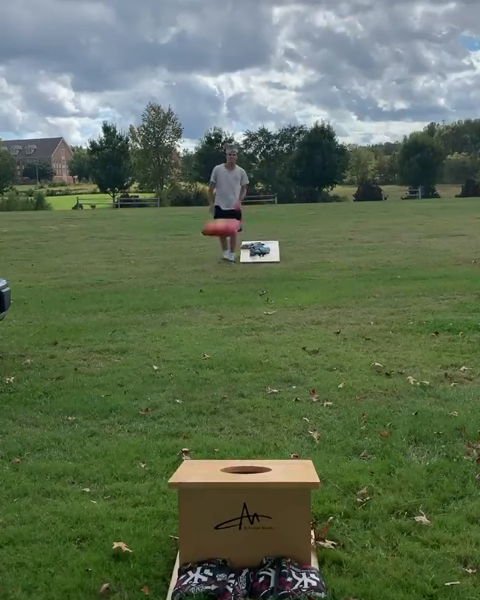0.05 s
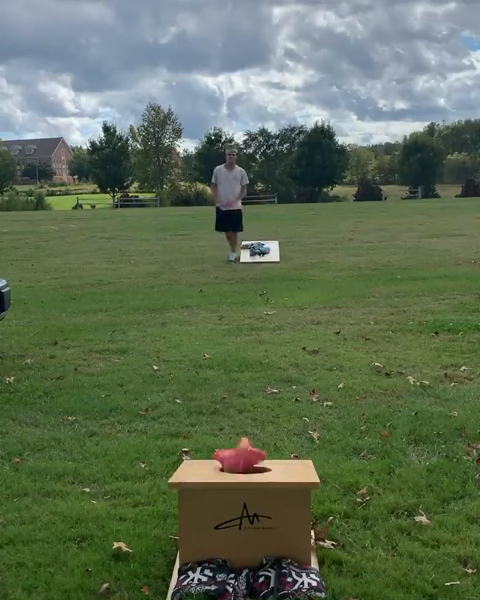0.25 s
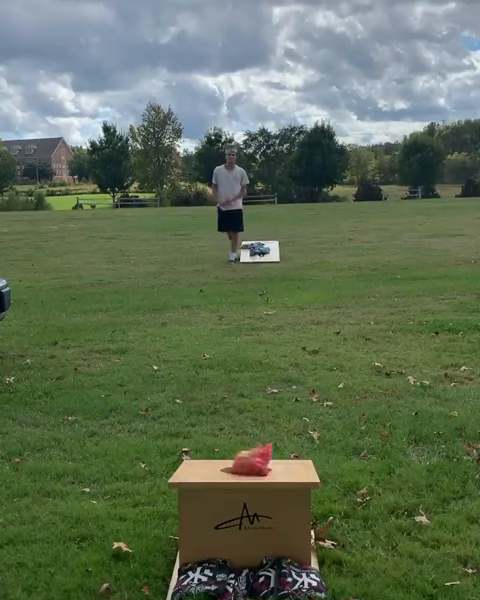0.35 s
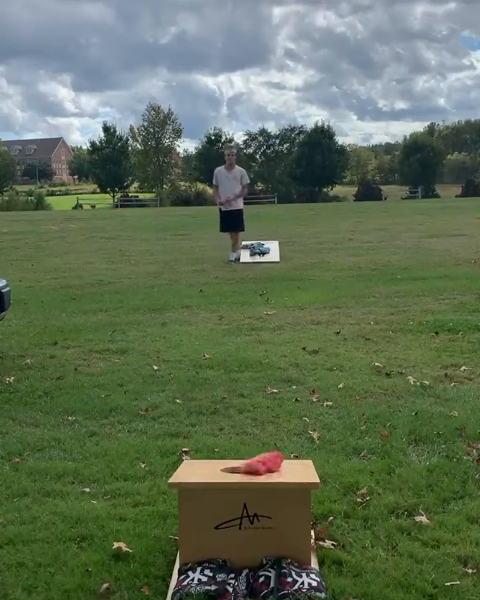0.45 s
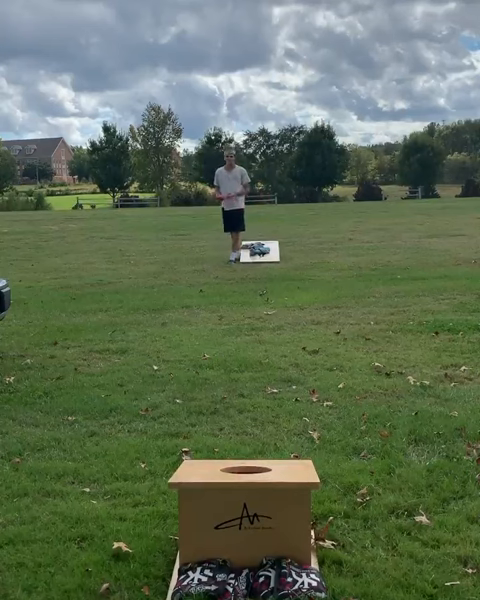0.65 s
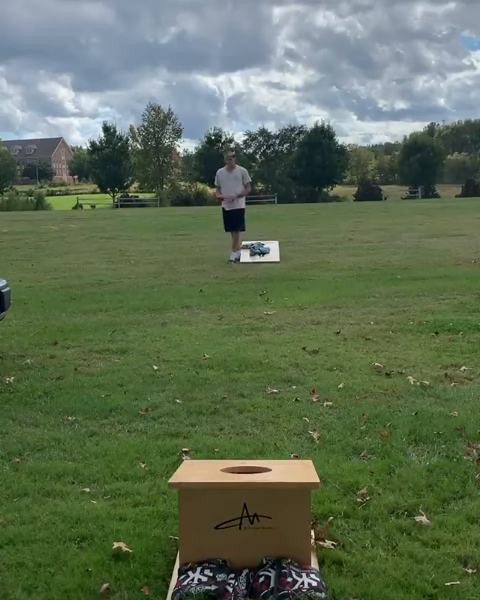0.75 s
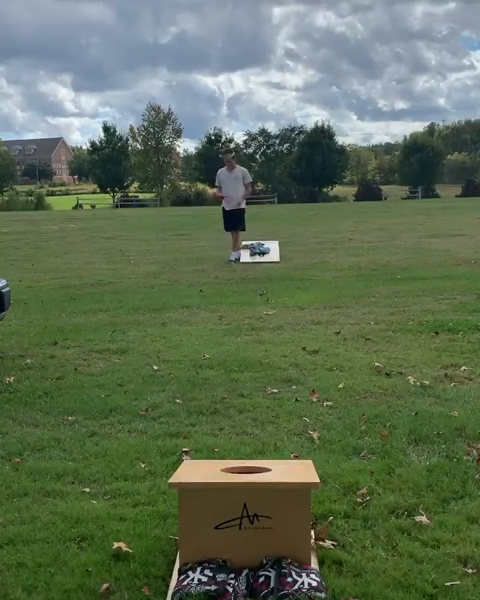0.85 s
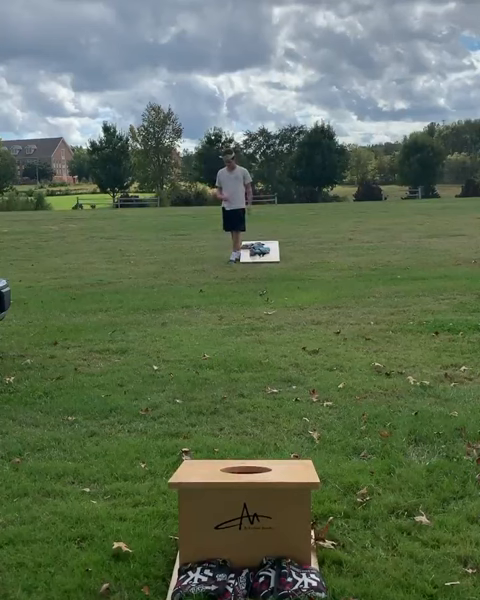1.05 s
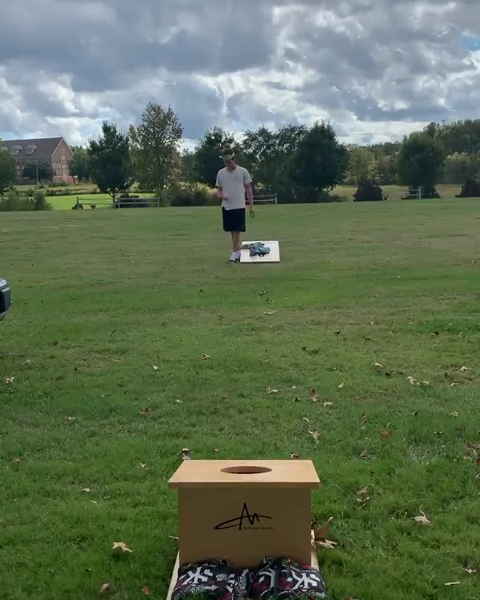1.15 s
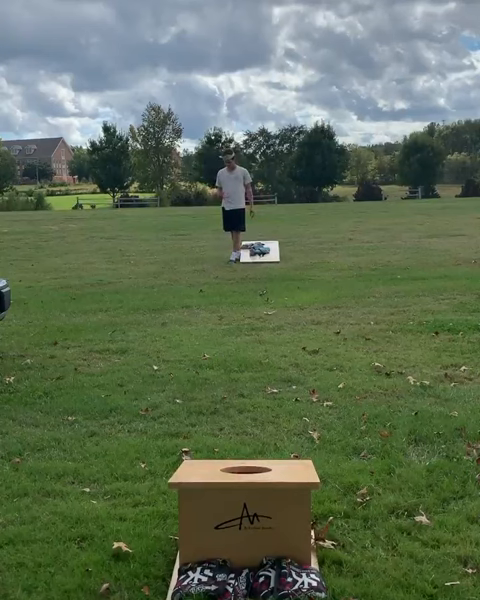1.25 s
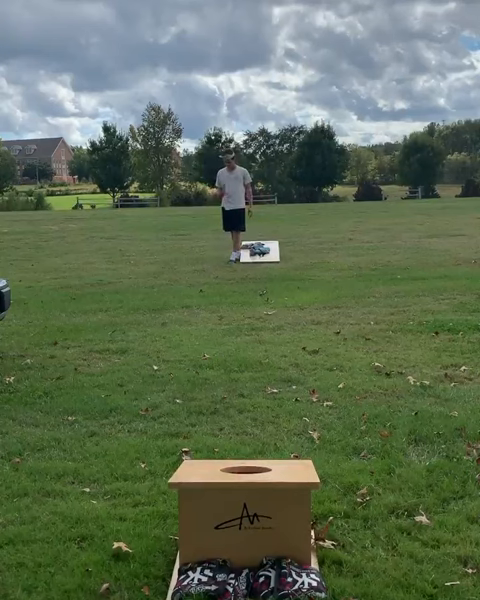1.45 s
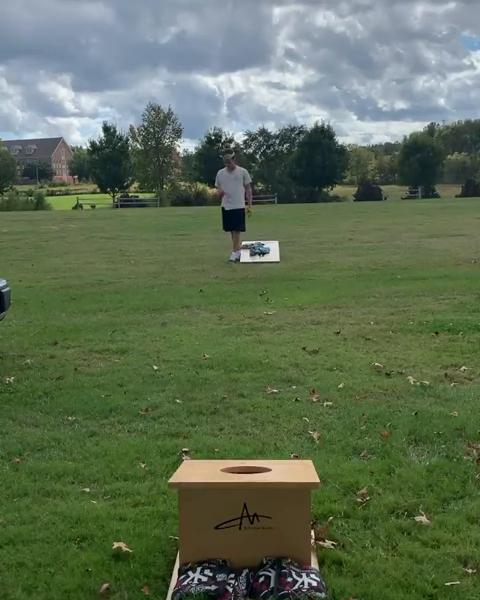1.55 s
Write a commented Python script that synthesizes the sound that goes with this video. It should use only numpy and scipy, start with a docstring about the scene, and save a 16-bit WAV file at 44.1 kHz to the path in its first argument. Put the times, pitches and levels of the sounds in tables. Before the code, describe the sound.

A beanbag smacks onto a hollow wooden box lid outdoors, over faint distant traffic rumble

```python
"""A beanbag slaps onto the lid of a hollow plywood box on a lawn: contact pushes excite decaying modes.
Its filling crunches as dense pellet ticks, then shaped noise rustles as the bag slides through the hole.
Delayed copies echo the slap from the sides, and decaying noise scatters it off things nearby.
Far traffic and leaves are noise in octave bands; a far engine is a set of wavering low lines.
A phone a few metres in front hears the scene through its microphone's colour."""
import sys
import numpy as np
from scipy import signal
from scipy.fft import rfft, irfft
from scipy.io import wavfile
from scipy.ndimage import uniform_filter1d, map_coordinates

SR = 44100
rng = np.random.default_rng(int(sys.argv[2]) if len(sys.argv) > 2 else 0)


def master_out(mix):
    """Clip the mix to full scale and print it as 16-bit PCM to the path in sys.argv[1]."""
    frames = np.transpose(np.atleast_2d(mix))
    ceiling = np.clip(frames, -1, 1)
    pcm = np.round(ceiling * 32767).astype(np.int16)
    wavfile.write(sys.argv[1], SR, pcm)


def invert_db(level):
    """Linear amplitude ratio for a level in decibels (20 dB per decade), elementwise."""
    return 10 ** (np.asarray(level, dtype=float) / 20)


N = 70560

# far traffic and leaves, relative spectral density: (f/Hz, level/dB)
FIELD_SPECTRUM = [(20, -34), (45, -5.5), (75, -5.5), (120, -7.5), (150, -10.5), (240, -12), (380, -18.5),
                  (600, -17.5), (900, -15), (1300, -21.5), (1900, -23.5), (2400, -36), (4000, -35.5),
                  (7000, -42.5), (10000, -52.5), (16000, -68)]
# stereo width of the field: (f/Hz, side minus mid level/dB)
FIELD_WIDTH = [(60, -66), (110, -69), (200, -32.5), (380, -10.5), (700, -26.5), (1290, -31), (2380, -5.5),
               (4400, -15), (8120, -7.5), (15000, -3.5)]
# lines of the far engine before wavering: (f/Hz, rms level/dB)
ENGINE_LINES = [(51, -67.5), (68, -48), (85, -59.5), (103, -44.5), (122, -49), (196, -65.5), (305, -57),
                (320, -60)]
# echoes from the sides: (delay t/s, level/dB, half the left-right lag t/s, positive leads on the left)
SIDE_ECHOES = [(.0203, -19.5, .00012), (0.0351, -26, -.00005)]
# colour of the diffuse scatter: (f/Hz, level/dB)
SCATTER_COLOUR = [(100, -53), (250, -11), (500, -14), (1500, -1), (4000, 2), (9000, 0.5), (16000, -1)]
# cloth sliding over the rim of the hole: (middle t/s, half length t/s, level/dB, loss at 16 kHz/dB)
RIM_SLIDES = [(0.376, 0.039, -60, -11), (.64, 0.16, -63.5, 9.0)]
# colour of the cloth rustle: (f/Hz, level/dB)
CLOTH_COLOUR = [(2500, -5), (5000, 1), (9000, 11.5), (13000, -14), (16000, -0.5)]
# clumps of filling packing down: (start t/s, level/dB re CLUMP_DB)
FILLING_CLUMPS = [(.2414, -5), (.2424, 0), (.2440, -3), (.2457, 1), (.2481, -4), (.2505, -7), (.2545, -6),
                  (.2571, -5), (.2594, -9), (.2655, -14)]
# colour of the pellet ticks: (f/Hz, level/dB)
PELLET_COLOUR = [(1000, -30), (2000, 6.5), (3000, 1.5), (4700, 4.5), (5900, 3.5), (6900, -4.5), (8000, 2),
                 (10000, -10), (11500, -6.5), (13000, -11.5), (16000, -14)]
# the bag lands edge first, then with its weight, then flops over: (t/s, level/dB, contact spread t/s)
CONTACTS = [(.24156, -11.7, .00016), (.24252, 0, .00018), (.24474, -16, .00012)]
# modes of lid and air: (f/Hz, level/dB, t60/s, +1 or -1 as it first moves toward or away from the phone)
BOX_MODES = [(152.5, -9, .152, -1), (180, -1.2, .026, 1), (247, -9.9, .032, -1), (296, -23, .171, -1),
             (366, -21.4, .169, 1), (435, -7.5, .027, 1), (490, .2, .023, -1), (634, -10, .05, -1),
             (677, -19.1, .089, -1), (746, -9.3, .045, 1), (858, -13, .026, 1), (993, -21.9, .077, -1),
             (1196, -6.1, .037, 1), (1412, -15.7, .05, -1), (1642, 3.7, .053, 1), (1870, -15.8, .101, 1)]
# the two capsules hear a frontal sound alike except toward the top: (f/Hz, side minus mid level/dB)
FRONT_WIDTH = [(5000, -40), (10000, -22), (12500, -7), (16000, -7)]
# response of the phone microphone: (f/Hz, level/dB)
MIC_RESPONSE = [(3000, 0), (3800, 0), (4350, -6), (4680, -22), (5000, -5), (5400, 0), (6300, 2), (7100, 0),
                (7900, -4), (8450, -1), (8700, -15), (9150, -15), (9450, -1), (10300, -6), (11000, 0),
                (11950, 0), (12250, -18), (12650, -4), (13000, -20), (13450, -3), (15650, 0), (15850, -45)]

FIELD_DB, SWELL_DB, FLICKER_DB = -40.5, .4, .7
WAVER_HZ, WAVER_DB = 1.31, 2.5
ECHO_LOW_HZ = 330  # the echoes are thin, without bass below this
SCATTER_DB, SCATTER_RISE_S, SCATTER_T60_S = -13.5, .007, .22
PELLETS_PER_S, PELLET_SPREAD_DB = 22000, 1.0
CLUMP_DB, CLUMP_DECAY_S, CRUNCH_RISE_S = -15.5, .001, .0003
SETTLE_DB, SETTLE_T60_S = -25.5, .1
BOX_LOW_HZ = 110  # a small box radiates little below this


def read(table, hz):
    """Interpolation: the level in dB of an (f/Hz, level/dB) table, straight on a log-frequency axis."""
    a = np.array(table, float)
    return np.interp(np.log(hz + 1), np.log(a[:, 0]), a[:, 1])


def colour(x, table):
    """Minimum phase: folding the cepstrum of the table's gains gives a causal filter."""
    size = 4096
    hz = np.arange(size // 2 + 1) * SR / size
    cepstrum = irfft(read(table, hz) * np.log(10) / 20)
    cepstrum[1:size // 2] *= 2
    cepstrum[size // 2 + 1:] = 0
    response = irfft(np.exp(rfft(cepstrum)))[:size // 2]
    return signal.fftconvolve(x, response)[:N]


def unit(x):
    """Normalisation: the signal scaled to rms 1."""
    return x / np.sqrt(np.mean(x ** 2))


def walk(rate):
    """Smoothed random steps: a slow wander of rms 1 with rate new steps a second."""
    k = int(SR / rate)
    steps = np.repeat(rng.standard_normal(N // k + 1), k)
    return unit(uniform_filter1d(uniform_filter1d(steps, k), k)[:N])


def late(x, delay_s):
    """Propagation delay: interpolation between samples allows a fractional time."""
    return map_coordinates(x, [np.arange(N) - delay_s * SR], mode="nearest")


def field():
    """Superposed noise of many far sources: overlapping octave bands swell together and flicker alone."""
    hz = np.arange(N // 2 + 1) * SR / N
    density = read(FIELD_SPECTRUM, hz)
    mid = rfft(rng.standard_normal(N)) * invert_db(density)
    side = rfft(rng.standard_normal(N)) * invert_db(density + read(FIELD_WIDTH, hz))
    octave = np.log2(hz / 30 + 1e-9)
    swell = walk(1.5)
    out = 0
    for k in range(11):
        band = np.clip(1 - np.abs(octave - k + 1), 0, 1)
        m, s = irfft(mid * band, N), irfft(side * band, N)
        gain = invert_db(SWELL_DB * swell + FLICKER_DB * walk(9.04))
        out = out + gain * np.array([m + s, m - s])
    return invert_db(FIELD_DB) * unit(out)


def engine():
    """Line spectrum with frequency and amplitude modulation: each low line drifts and swells alone."""
    out = 0
    for hz, db in ENGINE_LINES:
        level = np.sqrt(2) * invert_db(db + WAVER_DB * walk(5.7))
        cycles = rng.random() + np.cumsum(hz + WAVER_HZ * walk(5.935)) / SR
        out = out + level * np.sin(2 * np.pi * cycles)
    return out


def surroundings(bag, t):
    """Reflection and scattering: lagged side echoes, and a diffuse tail off grass and things nearby."""
    highpass = signal.butter(2, ECHO_LOW_HZ, "high", fs=SR, output="sos")
    thin = signal.sosfilt(highpass, bag)
    echoes = sum(invert_db(db) * np.array([late(thin, delay - lag), late(thin, delay + lag)])
                 for delay, db, lag in SIDE_ECHOES)
    shape = (1 - np.exp(-t / SCATTER_RISE_S)) * invert_db(-60 * t / SCATTER_T60_S)
    # independent tails left and right, each of about unit energy
    tail = rng.standard_normal((2, N)) * shape / np.sqrt(np.sum(shape ** 2))
    scatter = signal.fftconvolve(tail, colour(bag, SCATTER_COLOUR)[None])[:, :N]
    return echoes + invert_db(SCATTER_DB) * scatter


def cloth(t):
    """Sliding friction: a faint bright rustle over the rim, duller once the bag is inside the hole."""
    noise = unit(colour(rng.standard_normal(N), CLOTH_COLOUR))
    rustle = invert_db(2.0 * walk(61.5)) * noise
    out = 0
    for middle, half, db, lost_db in RIM_SLIDES:
        swell = np.exp(-((t - middle) / half) ** 2)
        out = out + invert_db(db) * swell * colour(rustle, [(9000, 0), (16000, -lost_db)])
    return out


def filling(t):
    """Granular impacts: dense pellet ticks of uneven size, in quick clumps over a settling crunch."""
    hit = rng.random(N) < PELLETS_PER_S / SR
    size = invert_db(PELLET_SPREAD_DB * rng.exponential(size=N))
    ticks = unit(colour(hit * rng.standard_normal(N) * size, PELLET_COLOUR))

    def burst(start, decay_s):
        """Relaxation: silence until the start, a quick rise, then an exponential fall."""
        age = np.abs(t - start)
        return (t > start) * np.exp(-age / decay_s) * (1 - np.exp(-age / CRUNCH_RISE_S))

    settling = invert_db(SETTLE_DB) * burst(CONTACTS[0][0], SETTLE_T60_S / np.log(1000))
    clumps = sum(invert_db(CLUMP_DB + db) * burst(start, CLUMP_DECAY_S) for start, db in FILLING_CLUMPS)
    return ticks * (settling + clumps)


def box(t):
    """Modal superposition: each contact is a smooth push that sets all modes of lid and air ringing."""
    force = 0
    for start, db, spread in CONTACTS:
        push = np.exp(-.5 * ((t - start) / spread) ** 2)
        force = force + invert_db(db) * push / (spread * SR * np.sqrt(2 * np.pi))  # level sets the impulse
    ring = sum(sign * invert_db(db) * np.sin(2 * np.pi * hz * t) * invert_db(-60 * t / t60)
               for hz, db, t60, sign in BOX_MODES)
    radiate = signal.butter(3, BOX_LOW_HZ, "high", fs=SR, output="sos")
    return signal.sosfilt(radiate, signal.fftconvolve(force, ring)[:N])


def scene():
    """Linear superposition: bag and box straight ahead, echoes and field around."""
    t = np.arange(N) / SR
    bag = box(t) + filling(t) + cloth(t)
    side = late(colour(bag, FRONT_WIDTH), .0003)
    front = np.array([bag + side, bag - side])
    return front + surroundings(bag, t) + engine() + field()


def band_limit(x):
    """A steep low-pass at the top of the band."""
    return signal.sosfilt(signal.butter(12, 16420, fs=SR, output="sos"), x)


def record(dry):
    """Linear filtering: the microphone response colours both channels alike."""
    mix = np.array([colour(channel, MIC_RESPONSE) for channel in dry])
    return band_limit(mix)


dry = scene()
out = record(dry)
master_out(out)
```